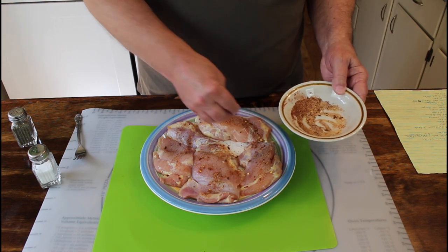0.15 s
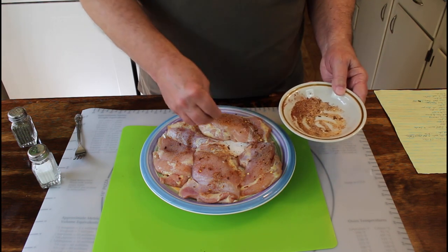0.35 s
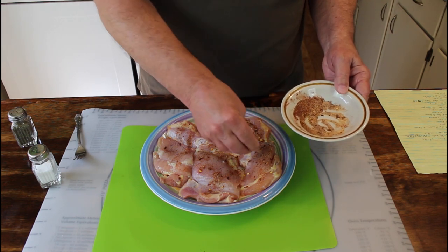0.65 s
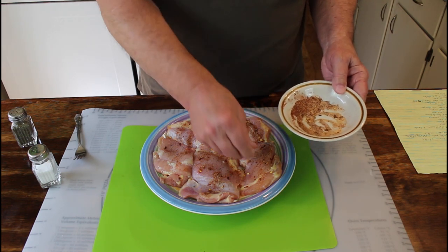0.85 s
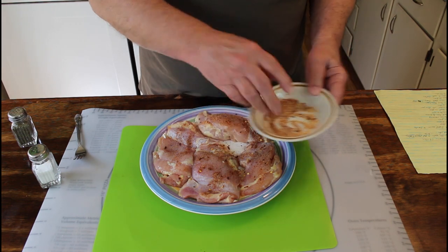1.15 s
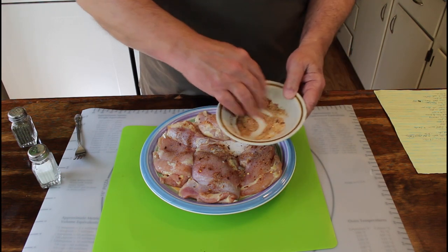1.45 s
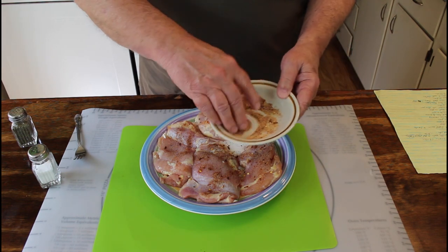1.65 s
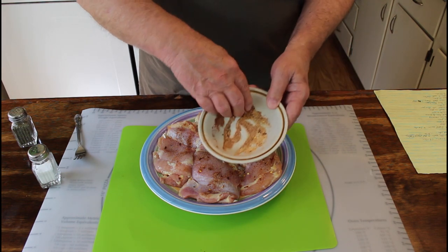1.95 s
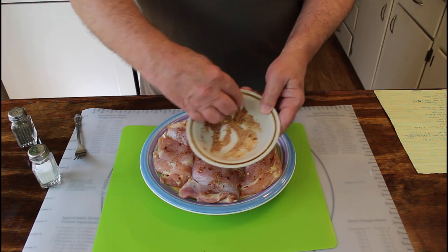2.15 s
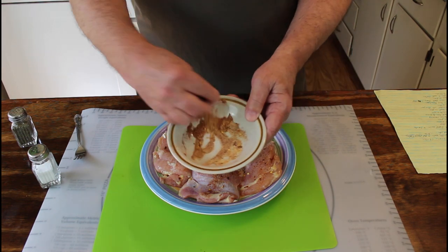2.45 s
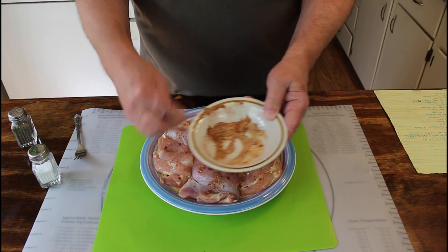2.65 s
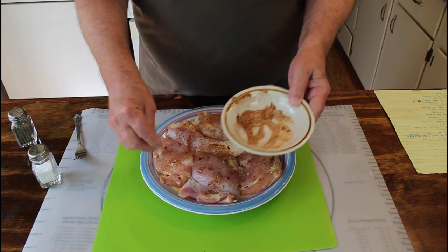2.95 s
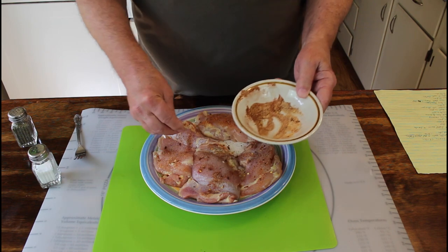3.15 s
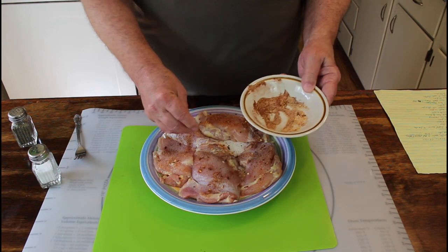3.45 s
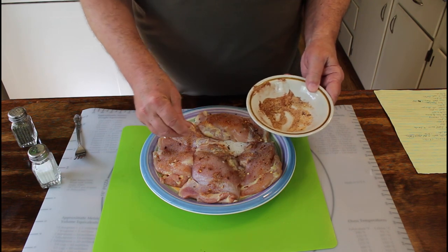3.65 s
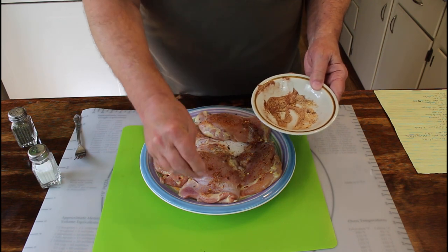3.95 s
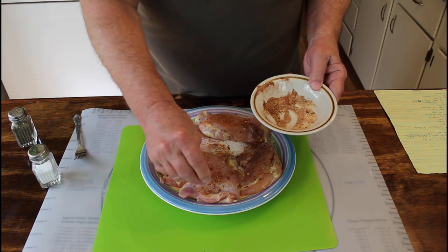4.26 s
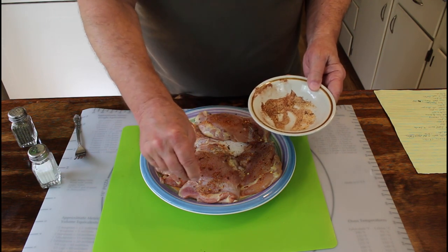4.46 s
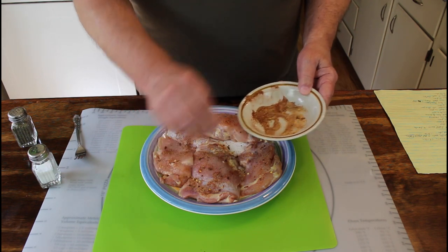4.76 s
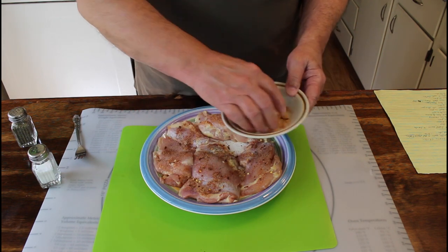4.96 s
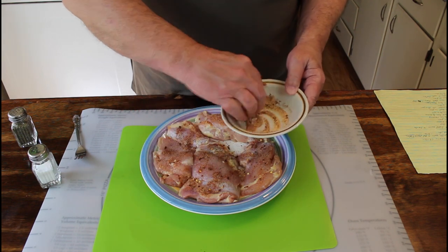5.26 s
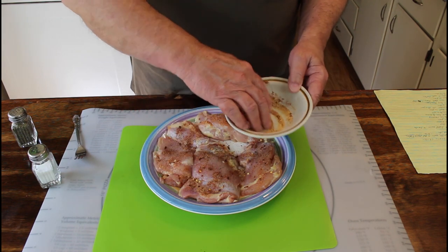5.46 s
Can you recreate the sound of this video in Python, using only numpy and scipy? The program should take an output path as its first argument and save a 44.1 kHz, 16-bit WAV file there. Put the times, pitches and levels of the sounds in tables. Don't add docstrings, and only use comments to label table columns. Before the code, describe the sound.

In a quiet kitchen with a low fridge hum, something wooden is bumped and rattles at once. Fingers then rub and crunch dry spice in a ceramic bowl, with nail clicks and a light ting. Faint pinches follow, a knob clicks, and an out-of-sight igniter snaps four loud, echoing times. Gas catches with a soft puff; ticks, a bump and a short pan slide end it. One gain-controlled microphone, nearly mono with light hiss.

```python
import sys
import numpy as np
from scipy import signal
from scipy.fft import rfft, irfft
from scipy.io import wavfile

SR = 44100
rng = np.random.default_rng(int(sys.argv[2]) if len(sys.argv) > 2 else 0)


def file_out(sig):
    cols = np.atleast_2d(sig).T
    lim = np.clip(cols, -1, 1)
    pcm = np.round(lim * 32767).astype(np.int16)
    wavfile.write(sys.argv[1], SR, pcm)


def linear_from_db(decibels):
    return 10 ** (np.asarray(decibels, float) / 20)


N = 246519


def rms_one(x):
    return x / np.sqrt(np.mean(x ** 2) + 1e-20)


def at_hz(points, hz):
    points_hz, points_db = np.transpose(points)
    return np.interp(np.log(hz), np.log(points_hz), points_db, left=-90, right=-90)


def drift(rate_hz):
    r = np.exp(-80 * np.pi * rate_hz / SR)
    white = rng.standard_normal(N // 40 + 2002)
    slow = rms_one(signal.lfilter([1], [1, -2 * r, r * r], white)[2000:])
    return np.interp(np.arange(N) / 40, np.arange(len(slow)), slow)


def coloured(x, spectrum):
    hz = np.maximum(np.fft.rfftfreq(len(x), 1 / SR), 1)
    return rms_one(irfft(rfft(x) * linear_from_db(at_hz(spectrum, hz)), len(x)))


def band_noise(low_hz, high_hz):
    sos = signal.butter(2, [low_hz, high_hz], "band", fs=SR, output="sos")
    return rms_one(signal.sosfilt(sos, rng.standard_normal(N)))


def grains(per_s, spread_db):
    sizes = linear_from_db(spread_db * np.minimum(rng.exponential(1, N), 4)) * rng.choice([-1, 1], N)
    return sizes * (rng.random(N) < per_s / SR) + 1e-18


def resonate(x, modes):
    out = 0
    for k, (hz, width_hz, level_db) in enumerate(modes):
        r = np.exp(-np.pi * width_hz / SR)
        a = [1, -2 * r * np.cos(2 * np.pi * hz / SR), r * r]
        gain = (-1) ** k * linear_from_db(level_db) * (1 - r * r)
        out = out + gain * signal.lfilter([1, 0, -1], a, x)
    return rms_one(out)


def ring(hz, t60_s, size=2000):
    t = np.arange(size) / SR
    return np.sin(2 * np.pi * hz * t) * linear_from_db(-60 * t / t60_s)


def swell(start_s, level_db, rise_s, hold_s, fade_s):
    t, power = np.arange(0, N + 32, 32) / SR, 1e-20
    for s, db, rise, hold, fade in np.broadcast(start_s, level_db, rise_s, hold_s, fade_s):
        away = np.maximum((s - t) / max(rise, .001), (t - s - hold) / max(fade, .001))
        power = power + linear_from_db(db - 20 * np.clip(away, 0, 6)) ** 2
    return np.interp(np.arange(N) / SR, t, np.sqrt(power))


def reverberation(size=30000):
    # hz, t60_s
    kitchen = [(250, 0.1), (1300, 0.46), (3500, 0.45), (9000, 0.32), (15000, 0.29)]
    kitchen_hz, kitchen_t60_s = np.transpose(kitchen)
    t, out = np.arange(size) / SR, 0
    edges_hz = 150 * 2 ** np.arange(0, 7.1, .5)
    white = rng.standard_normal((2, size))
    for k, (low, high) in enumerate(zip(edges_hz, edges_hz[1:])):
        band = signal.sosfilt(signal.butter(2, [low, high], "band", fs=SR, output="sos"), white[k % 2])
        t60_s = np.interp(np.log(low * high) / 2, np.log(kitchen_hz), kitchen_t60_s)
        out = out + band * linear_from_db(-60 * t / max(t60_s, .05))
    return out / np.sqrt(np.sum(out ** 2))


def background():
    # hz, db_per_hz
    air_colour = [(41, -34), (70, -5), (88, -19), (113, -11.5), (529, -20.5), (1100, -20.5), (1810, -31.5),
                  (4190, -28.5), (6750, -36.5), (14900, -39.5), (16000, -37)]
    stir_colour = [(88, -46), (150, -12.5), (254, -10), (306, -1), (658, -9), (756, -13), (1140, -8.5),
                   (2580, -16.5), (3000, -19.5), (3900, -70), (6600, -120)]
    # time_s, level_db
    stir_levels = [(0.5, -60), (0.812, -65.5), (1.14, -58), (1.9, -59.5), (2.2, -53.5), (2.41, -59.5),
                   (2.86, -62), (3.11, -65.5), (3.76, -61), (4.1, -65.5), (4.5, -57.5), (4.85, -53.5),
                   (5.35, -56), (5.456, -52), (5.59, -57)]
    t = np.arange(N) / SR
    hum = np.sqrt(2) * linear_from_db(-54) * np.cos(2 * np.pi * 60.022 * t - 1.45)
    air = linear_from_db(-61.0) * coloured(rng.standard_normal(N), air_colour)
    restless = rng.standard_normal(N) * linear_from_db(3.1 * drift(3.9))
    stir = linear_from_db(np.interp(t, *np.transpose(stir_levels))) * coloured(restless, stir_colour)
    return hum + air + linear_from_db(-1.33) * stir + linear_from_db(-73) * band_noise(25, 90)


def bumps():
    # start_s, hold_s, body_db, edge_re_body_db
    hits = [
        (0.0, .05, -49, -12),
        (0.057, .01, -48.5, -10.5),
        (0.124, .015, -37, -6.5),
        (0.146, 0.016, -36, -31),
        (0.258, .01, -39.5, -4),
        (0.269, .02, -32.5, -12.5),
        (1.807, 0.0035, -48, -6),
        (5.325, 0.019, -44.5, 0),
        (5.361, 0.0055, -55, 7),
    ]
    # hz, width_hz, level_db
    wood_modes = [(352, 10.3, -1.5), (581, 30, 13.5), (890, 160, 3), (1092, 22, 7)]
    # hz, db_per_hz
    thud_colour = [(41, -41), (70, -7), (271, -11), (322, -1.5), (866, -7), (1150, -14.5), (3000, -19.5),
                   (3900, -49), (6600, -120)]
    edge_colour = [(710, -35), (1200, 1.5), (1890, -6), (2440, -10), (3070, -6), (3360, -7), (10000, -28.5),
                   (13000, -64), (22000, -120)]
    attack_s, body_fade_s, edge_fade_s = 0.0033, 0.15, 0.13
    heavy_db, light_fade_share = -42, 0.43
    s, hold_s, body_db, edge_db = np.transpose(hits)
    lasting = np.where(body_db > heavy_db, 1, light_fade_share)
    body = swell(s, body_db, attack_s, hold_s, lasting * body_fade_s)
    edge = swell(s, body_db + edge_db, attack_s, 0.13 * hold_s, lasting * edge_fade_s)
    shake = grains(1500, spread_db=-0.5)
    wood = linear_from_db(-4.0) * resonate(shake, wood_modes) + linear_from_db(-5) * coloured(shake, thud_colour)
    rattle = coloured(grains(8000, spread_db=3.5), edge_colour)
    return body * wood + linear_from_db(-1.5) * edge * rattle


def fingers():
    # peak_s, fade_s (per 20 dB), crunch_db, dust_re_crunch_db
    strokes = [(0.6, 1.4, -61.5, -8), (0.664, 0.05, -61, 3), (0.854, 0.02, -56.5, 7), (1.15, .3, -65, -19),
               (1.24, .15, -63, -19), (1.513, 0.09, -56.5, 5.5), (1.95, 0.2, -60, -4),
               (2.32, -0.1081, -36.5, -11), (2.27, 0.23, -54.5, -9), (2.544, 6, -73, 0),
               (3.16, -0.06, -64.5, -10), (3.34, 0.06, -69, -10), (3.655, -0.07, -60, 3),
               (3.778, -0.2, -66, -16.5), (3.926, 0.26, -56.5, -15), (5.06, 0.2, -66, 4),
               (5.22, .15, -64, 7), (5.37, -0.4, -63, -23), (5.49, -0.02, -46, -23),
               (5.58, 0.14, -66.5, 10)]
    digs = [
        (1.338, 0.22, -70, 0),
        (1.443, 0.065, -65.5, 9),
        (1.689, 0.11, -51, -20),
        (1.798, 0.15, -49, -6.5),
        (2.162, 0.1, -59.5, -2),
        (2.662, .1, -62.5, -23),
    ]
    # peak_s, fade_s (per 20 dB), ring_db
    drags = [
        (0.854, 0.1, -62),
        (1.35, 0.14, -66.5),
        (1.51, -0.5, -63),
        (1.84, 0.9, -75),
        (1.93, -0.05, -62),
        (2.0, 0.4, -63.5),
        (2.27, 0.08, -64),
        (2.32, -0.03, -63.5),
        (2.53, 0.1, -64),
    ]
    # hz, db_per_hz
    rub_colour = [(530, -26), (900, 2), (1440, -5.5), (2200, 1), (2970, -1), (3860, -3), (7010, -8.5),
                  (9000, -23), (11700, -29), (19800, -120)]
    hiss_colour = [(3530, -12), (6000, 0.5), (7400, -3), (8720, -6), (10500, -7.5), (12500, -6.5),
                   (16000, -12)]
    # hz, width_hz, level_db
    bowl_modes = [(2930, 120, -7), (5120, 60, 0), (7290, 90, -9), (7680, 70, -7), (9230, 110, -9),
                  (10600, 130, -10), (12300, 160, -9), (14400, 160, -9)]
    rise_share = 0.65
    dig_rise_s, dig_hold_s = 0.017, .035

    s, fade_s, crunch_db, dust_db = np.transpose(strokes + digs)
    sudden = np.arange(len(s)) >= len(strokes)
    rise_s, hold_s = np.where(sudden, dig_rise_s, rise_share * fade_s), dig_hold_s * sudden
    rub = swell(s, crunch_db, rise_s, hold_s, fade_s)
    hiss = swell(s, crunch_db + dust_db, rise_s, hold_s, fade_s)
    s, fade_s, ring_db = np.transpose(drags)
    drag = swell(s, ring_db, rise_share * fade_s, 0.02, fade_s)
    bowl = drag + linear_from_db(-25) * rub

    crunch = rub * coloured(grains(9000, spread_db=4.5) * linear_from_db(2.8 * drift(16.6)), rub_colour)
    dust = hiss * coloured(grains(14000, spread_db=1.0), hiss_colour)
    grit, ceramic = grains(3000, spread_db=3.5), 0
    for hz, width_hz, level_db in bowl_modes:
        mode_db = level_db - 0.25 * hz / 1000 + 3.0 * drift(15)
        ceramic = ceramic + linear_from_db(mode_db) * resonate(grit, [(hz, width_hz, level_db)])
    return linear_from_db(-1.57) * crunch + linear_from_db(0.3) * dust + linear_from_db(2.5) * rms_one(ceramic) * bowl


def sprinkles():
    # start_s, hold_s, level_db
    pinches = [
        (0.637, .04, -64),
        (0.838, 0.028, -59),
        (2.67, .04, -68.5),
        (2.865, 0.043, -66),
        (2.99, .04, -66),
        (3.3, 0.063, -65.5),
        (3.466, 0.036, -63),
        (3.636, 0.038, -60),
    ]
    # hz, width_hz, level_db
    hollow = [(2600, 900, 0), (5200, 1800, -1)]
    s, hold_s, level_db = np.transpose(pinches)
    rustle = resonate(resonate(grains(9000, spread_db=2.5), hollow), hollow)
    return swell(s, level_db, 0.028, hold_s, 0.05) * rustle


def wall_pipe():
    gain = swell(1.15, -72, rise_s=0.22, hold_s=.33, fade_s=.15)
    return gain * resonate(rng.standard_normal(N), [(2050, 110, 0)])


def ticks():
    # start_s, peak_db, pitch_hz
    snaps = [(1.5105, -33, 7150), (1.6524, -56, 6470), (3.3284, -57, 10100), (3.354, -43, 6330),
             (3.8825, -35, 7200), (5.0748, -43, 9250), (5.1612, -40.5, 12800), (5.2695, -31.5, 7900),
             (5.3, -45, 6800), (5.3234, -24.5, 5900), (5.3316, -25, 7040), (5.3516, -28, 7700),
             (3.7855, -31.5, 6000)]
    clicks = [
        (1.5294, -41, 4200),
        (1.5828, -42.5, 2950),
        (1.701, -54, 4800),
        (2.685, -49.5, 2280),
        (3.7855, -34, 4340),
        (3.9145, -39, 3430),
        (5.3702, -34, 3900),
        (2.278, -47, 2490),
        (2.3165, -43, 2960),
    ]
    knocks = [
        (1.797, -42, 1440),
        (2.277, -49, 1140),
        (2.317, -42.5, 1190),
        (3.785, -40.5, 1010),
        (3.915, -39.5, 1310),
        (5.323, -40, 720),
        (5.37, -42, 1710),
    ]
    tings = [
        (2.2774, -52, 5120),
        (2.3157, -39, 5170),
    ]
    out, n = np.zeros(N + 2000), np.arange(2000)
    rise = np.clip(n / 6, 0, 1)
    crack_db, crack_t60_s = -2.5, 0.0024
    grit = rng.standard_normal(2000) * linear_from_db(crack_db - 60 * n / SR / crack_t60_s)
    for rows, t60_s in [(snaps, .002), (clicks, .007), (knocks, .024), (tings, .03)]:
        for s, level_db, hz in rows:
            band_hz = [hz * 3 / 4, min(hz * 4 / 3, 16000)]
            crack = signal.lfilter(*signal.butter(2, band_hz, "band", fs=SR), grit)
            overtone = 0.21 * (hz > 2000) * ring(min(hz * 1.36, 15000), 0.0025)
            tick = ring(hz, t60_s) + overtone + crack
            out[round(s * SR):][:2000] += linear_from_db(level_db + 2.7) * rise * tick
    return out[:N]


def squeak():
    # time_s, pitch_hz, level_db
    whine = [
        (2.45, 3800, -80),
        (2.53, 3950, -72),
        (2.64, 4200, -70),
        (2.77, 4280, -79),
    ]
    s, hz, level_db = np.transpose(whine)
    t = np.arange(N) / SR
    pitch_hz = np.interp(t, s, hz) + 40 * drift(120)
    tone = np.sin(2 * np.pi * np.cumsum(pitch_hz) / SR) * linear_from_db(2.0 * drift(30))
    return linear_from_db(np.interp(t, s, level_db, left=-120, right=-120)) * tone


def sparks(room):
    # start_s, peak_db
    firings = [
        (3.9624, -8.5),
        (4.2435, -7.5),
        (4.512, -7),
        (4.7788, -8),
    ]
    # delay_ms, level_db
    echo_rows = [(0, -7), (.3, 0), (.9, -5), (1.55, -1), (2.1, -8), (2.6, -8), (3.9, -5), (4.9, -5),
                 (6.75, 3), (7.05, 3), (8.1, -3), (16.5, -7), (18.3, -8)]
    # hz, db_per_hz
    tail_colour = [(300, -18.5), (900, -17), (2000, -12), (3500, -9), (6000, -2.5), (8000, 1.5),
                   (11000, -8), (14500, -20.5), (16500, -24)]
    train, echoes = np.zeros(N), np.zeros(1000)
    for s, level_db in firings:
        train[round(s * SR)] = linear_from_db(level_db)
    for ms, level_db in echo_rows:
        echoes[round(ms * SR / 1000)] = linear_from_db(level_db)
    snap = ring(6900, .0022, size=400) + 0.49 * ring(8300, 0.0062, size=400)
    snap = snap + 0.074 * ring(13000, 0.003, size=400) + 0.033 * ring(4300, 0.00032, size=400)
    thin = signal.butter(2, 2200, "high", fs=SR, output="sos")
    near = linear_from_db(-1.5) * signal.sosfilt(thin, np.convolve(echoes, snap))
    n = np.arange(len(room))
    scatter = room * (1 + 0.94 * linear_from_db(-60 * n / SR / 0.089))
    tail = coloured(np.r_[np.zeros(2000), scatter], tail_colour)[2000:] * np.clip(n / 40, 0, 1)
    return signal.fftconvolve(train, near)[:N] + linear_from_db(-25.5) * signal.fftconvolve(train, tail)[:N]


def gas_puff():
    # hz, db_per_hz
    puff_colour = [(150, -45), (250, -11), (332, 3.5), (549, -9), (668, -2.5), (1500, -17), (1950, -41),
                   (3300, -120)]
    sag_db, hold_s, fade_s = -3.5, .16, .06
    flame = swell(4.575, [0, sag_db], .02, [0, hold_s], [.15, fade_s]) * linear_from_db(2 * drift(16))
    boom = linear_from_db(-50) * band_noise(45, 260)
    flutter = linear_from_db(-45.5) * coloured(grains(1500, spread_db=0.5), puff_colour)
    return flame * (boom + flutter)


def pan_slide():
    # hz, width_hz, level_db
    pan_modes = [(1826, 75, 0), (2520, 500, -10), (3510, 230, -6), (4170, 130, -14), (5330, 390, -14)]
    gain = swell(5.375, -54.5, rise_s=0.022, hold_s=0.15, fade_s=0.074)
    scrape = grains(3700, spread_db=2.0) * linear_from_db(2.4 * drift(24))
    return linear_from_db(3.0) * gain * resonate(scrape, pan_modes)


def scene():
    room = reverberation()
    small = ticks()
    mono = background() + bumps() + fingers() + sprinkles() + wall_pipe()
    mono = mono + small + linear_from_db(-10) * signal.fftconvolve(small, room)[:N]
    mono = mono + squeak() + sparks(room) + gas_puff() + pan_slide()
    return np.array([mono, mono])


def top_cut(x):
    return signal.sosfilt(signal.butter(12, 17020, fs=SR, output="sos"), x)


def record(dry):
    t = np.arange(N) / SR
    over_db = np.maximum(20 * np.log10(np.abs(dry[0]) + 1e-9) + 24, 0) * 0.53
    release_db_per_s, lag_s = 160, 0.0075
    held_db = np.maximum.accumulate(over_db + release_db_per_s * t) - release_db_per_s * t
    r = np.exp(-1 / (lag_s * SR))
    gain = linear_from_db(-signal.lfilter([1 - r], [1, -r], np.maximum(held_db, 0)))
    hiss = linear_from_db(-65.5) * rng.standard_normal((2, N))
    ceiling = .55
    rounded = ceiling * np.tanh(gain * dry / ceiling)
    low_pass = signal.cheby2(12, 50, 16300, fs=SR, output="sos")
    return top_cut(signal.sosfilt(low_pass, rounded + hiss))


dry = scene()
out = record(dry)
file_out(out)
```